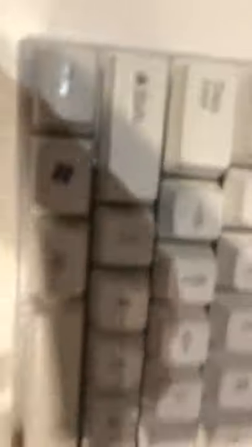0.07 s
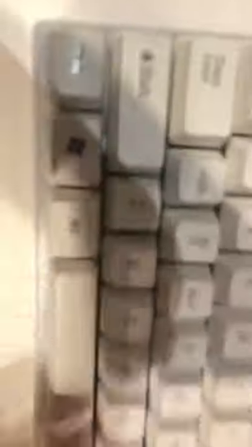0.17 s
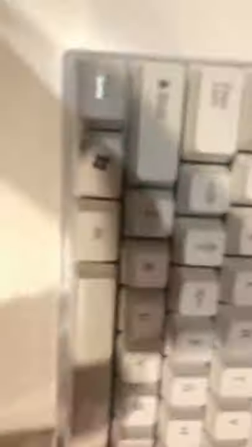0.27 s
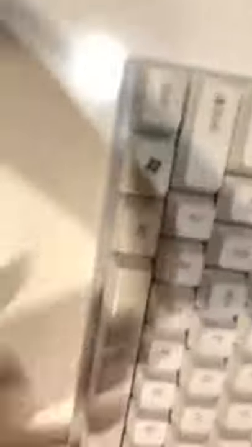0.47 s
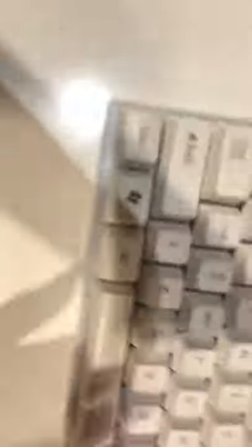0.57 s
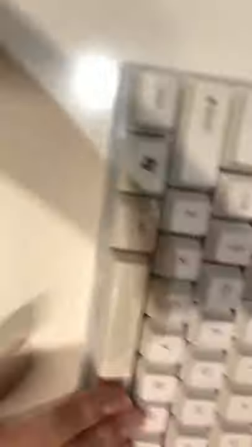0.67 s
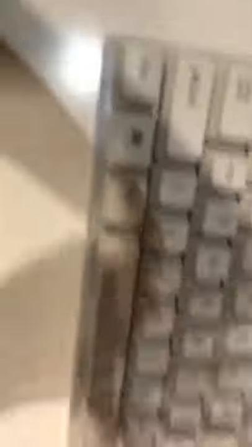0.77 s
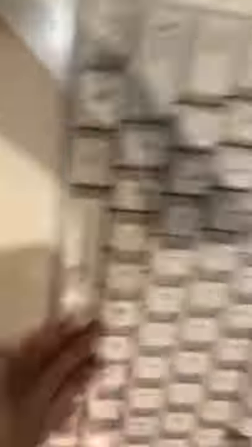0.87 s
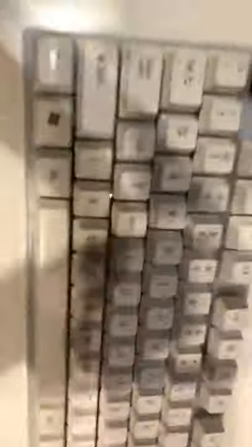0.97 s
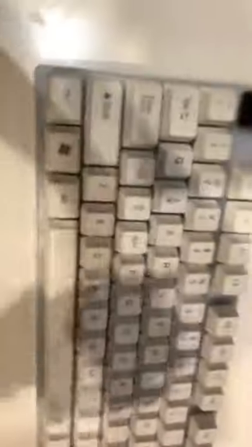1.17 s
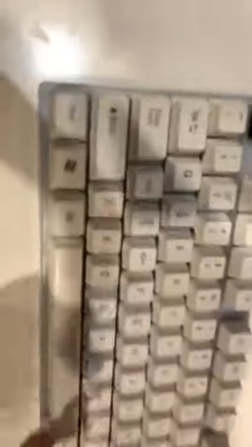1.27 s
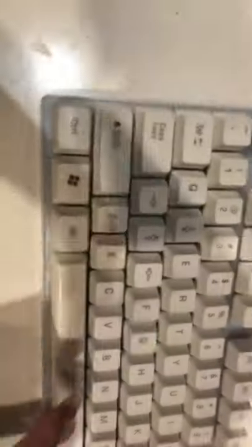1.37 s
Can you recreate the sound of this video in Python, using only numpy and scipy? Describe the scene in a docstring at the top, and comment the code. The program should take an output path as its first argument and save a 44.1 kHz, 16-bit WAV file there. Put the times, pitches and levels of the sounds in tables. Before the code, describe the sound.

A mechanical keyboard's spacebar is slapped five times close to the microphone, at about 0.2, 0.4, 0.55, 0.7 and 0.9 seconds. Each stroke is a sharp plastic clack with lighter rebound knocks and a faint spring ring. The desk thumps low underneath, more strongly on the last two. The bare room rings briefly, fading by about 1.3 seconds, with a faint electrical hum throughout.

```python
"""A faint mains hum in a bare room; then, close to the microphone, the spacebar of a mechanical keyboard
is slapped five times. A faint hiss swells just before each stroke; the bar chatters for a few
milliseconds as it bottoms out, rings the keycap and the case, and shakes the desk. Lighter knocks follow
as the bar rebounds, while the switch springs sing faintly and the room rings on. One microphone."""
import sys
import numpy as np
from scipy import signal
from scipy.fft import rfft, irfft
from scipy.io import wavfile

SR = 44100
rng = np.random.default_rng(int(sys.argv[2]) if len(sys.argv) > 2 else 0)


def transcribe(signal):
    """Save signal, clipped to [-1, 1], as a 16-bit WAV file at the path in sys.argv[1]."""
    frames = np.atleast_2d(signal).T
    limited = np.clip(frames, -1, 1)
    pcm = np.round(limited * 32767).astype(np.int16)
    wavfile.write(sys.argv[1], SR, pcm)


N = 61739

# Where the finger lands decides how much each part rings: start_s, clack_db, clack_pitch_ratio, tick_db,
# chatter_s, tray_db, case_db, plate_db, plate_pitch_ratio, keycap_db, keycap_pitch_ratio, stem_db,
# stabiliser_db, room_db, room_tilt_db_per_octave
STROKES = [(0.2331, -17.5, 0.76, -12.5, 0.003, -28, -11, -13, .81, -11, .98, -23.5, -21.5, -2.95, -0.5),
           (0.376, -18.5, 0.95, -18, 0.0049, -24.5, -14, -17, .96, -16, .92, -11.5, -23.5, -5, 1.47),
           (0.5453, -17, 0.88, -12.5, .0046, -18.5, -10.5, -27, 0.7, -11.5, 1.11, -33.5, -11.5, -2.5, 1),
           (0.702, -19, 0.92, -11.5, 0.005, -14, -9.5, -10.5, 0.96, -14.5, 1.08, -10.5, -14.5, 2.5, 0.5),
           (0.8776, -18, 0.63, -9.5, .0028, -21, -12, -12.5, 0.9, -12, 1.02, -14, -19.5, 5, 0.04)]
# Rebounds of the bar: start_s, clack_db, tick_db, tray_db, case_db
REBOUNDS = [(.2432, -15.5, -41, -25, -13.5), (.2485, -18.5, -44, -21.5, -41),
            (0.3921, -25, -38, -46.5, -40), (0.4138, -20.5, -42, -36.5, -23.5),
            (0.5589, -23.5, -37.5, -37, -26), (.7190, -23, -32, -35, -33.5), (0.759, -29, -24.5, -46, -30),
            (0.896, -15, -24, -22, -29), (0.923, -18, -39, -27.5, -15)]
# Shoves on the desk: start_s, level_db, pitch_ratio
SHOVES = [(0.244, -29.5, 1.4), (0.387, -30.5, 1.0), (.551, -30.5, 0.89), (0.715, -19.5, 1.0),
          (.886, -18.5, 0.97)]
# Mains harmonics: pitch_hz, level_db
HUM_HARMONICS = [(50, -75), (100, -73.5), (150, -56), (250, -68), (350, -80.5)]

# Noise spectra: frequency_hz, density_db
AIR_SPECTRUM = [(20, -34), (40, -12), (75, 0), (150, -8), (300, -13.5), (600, -19), (2000, -24.5),
                (5000, -31), (11000, -42), (16000, -42.5)]
LEAD_IN_SPECTRUM = [(200, -24.5), (1500, -18.5), (2800, -5.5), (3800, -9.5), (6000, -11), (8000, -11.5),
                    (10000, -37.5), (16000, -40)]  # the hiss just before each stroke
CLACK_SPECTRUM = [(30, -42.5), (150, -24.5), (500, -22.5), (800, -2), (1400, -4), (2100, 3), (2900, -1.5),
                  (3600, 0), (4400, -7.5), (6000, -6), (9000, -19), (16000, -23)]  # the duller clack of plastic
TICK_SPECTRUM = [(1000, -29), (5000, -15.5), (6900, -7), (8000, 3), (9200, -7), (10300, 0), (11200, -5.5),
                 (12400, -1), (14000, -12.5), (17000, -5)]  # the fine tick of the switch
ROOM_SPECTRUM = [(25, -31.5), (60, -7.5), (120, 2.5), (200, 0.5), (380, 0), (520, -6.5), (700, -4),
                 (850, -6.5), (1020, -1), (1500, -4), (2150, 2), (2900, -5.5), (4500, -9), (6200, -13.5),
                 (7500, -13), (8250, -11.5), (9000, -17), (11300, -17.5), (12100, -16.5), (13000, -18),
                 (16000, -22)]
# How long the room rings: frequency_hz, t60_s
ROOM_DECAY = [(100, .38), (400, 0.39), (750, 0.37), (1300, 0.41), (2200, 0.4), (4500, 0.39), (8000, 0.36),
              (12000, 0.32), (18000, .32)]

# Modes of each part: pitch_hz, level_db, t60_s
KEYCAP_MODES = [(1760, -10, .035), (2035, 0, .055), (2310, -9, .04), (2740, -4, .03), (3200, -7, .03)]
STEM_MODES = [(3340, -10, .045), (3562, 0, .06), (3675, -4, .05), (5150, -14, .035), (8280, -12, .045)]
STABILISER_MODES = [(4225, 0, .05), (4610, -8, .05), (4950, -2, .05), (5300, -6, .04), (6600, -6, .055),
                    (7900, -2, .04)]
CASE_MODES = [(652, 1.5, 0.049), (725, -14, 0.047), (811, 0.5, 0.046), (1010, -14.5, 0.025)]
PLATE_MODES = [(1069, -7.5, 0.064), (1254, -3, 0.05), (1326, -5, .07)]
TRAY_MODES = [(166, 0.5, 0.079), (200, -5, 0.063), (270, -7, 0.081), (346, -4, 0.071), (387, -1.5, .06),
              (436.5, -5.5, 0.084)]
SPRING_MODES = [(1010, 0, .46), (1178, -7, .45), (2043, -2, .48), (2205, -1, .5), (8130, -7, .33),
                (8370, -8, .33), (12100, -11, .32)]
DESK_MODES = [(46, -1, 0.16), (67.6, 4.5, 0.17), (81, -7, 0.056), (114.7, -6, 0.42), (65.7, -17.5, 1),
              (71.95, -22, 1.0)]

SMALL_PART_RISE_S, CASE_RISE_S, TRAY_RISE_S = 0.00068, 0.0023, 0.0033
CASE_LAG_S, TRAY_LAG_S = 0.0015, 0.003
LEAD_IN_S, ROOM_DELAY_S = 0.019, 0.003


def amp(db):
    """Decibels to gain."""
    return 10 ** (np.asarray(db) / 20)


def unit_rms(x):
    """Scales to rms 1."""
    return x / np.sqrt(np.mean(x ** 2) + 1e-20)


def read_curve(points, hz):
    """Reads a table on a log-frequency axis."""
    points_hz, values = np.transpose(points)
    return np.interp(np.log(hz + 1), np.log(points_hz), values)


def add(mix, start_s, sound):
    """Mixes a sound in at start_s."""
    part = mix[max(round(start_s * SR), 0):][:len(sound)]
    part += sound[:len(part)]


def colour(x, spectrum, tilt_db=0):
    """Gives x a spectrum, tilted by tilt_db per octave about 4 kHz, at rms 1."""
    hz = np.fft.rfftfreq(len(x), 1 / SR)
    octaves = np.log2(np.maximum(hz, 500) / 4000)
    gain = amp(read_curve(spectrum, hz) + tilt_db * octaves)
    return unit_rms(irfft(rfft(x) * gain, len(x)))


def room_tone(air_db=-62):
    """Mains hum and still air, steady behind the keyboard."""
    t = np.arange(N) / SR
    hum = sum(amp(db) * np.sqrt(2) * np.sin(2 * np.pi * (hz * t + rng.random()))
              for hz, db in HUM_HARMONICS)
    return hum + amp(air_db) * colour(rng.standard_normal(N), AIR_SPECTRUM)


def lead_in_hiss(growth_s=0.0046, trim_db=-4.5):
    """A faint hiss swells just before each stroke and fades as it lands."""
    t = np.arange(2048) / SR
    envelope = np.exp(-abs(t - LEAD_IN_S) / growth_s)
    return amp(trim_db) * colour(rng.standard_normal(len(t)), LEAD_IN_SPECTRUM) * envelope


def chatter(length_s, spectrum, pitch=1, contacts_per_s=8000, rise_s=0.0005, fall_s=0.00076):
    """Stem, stabiliser and keycap collide in a tight cluster; harder contacts sound higher."""
    t = np.arange(2048) / SR
    contacts = rng.choice([-1., 1.], len(t)) * (rng.random(len(t)) < contacts_per_s / SR)
    rattle = colour(contacts, [(hz * pitch, db) for hz, db in spectrum])
    envelope = np.minimum(t / rise_s, 1) * np.exp(-np.maximum(t - length_s, 0) / fall_s)
    return unit_rms(rattle * envelope) * np.sqrt(np.mean(envelope ** 2))


def ring(modes, rise_s, pitch=1):
    """A struck part: decaying modes start in alternate directions and swell while the blow lasts."""
    t = np.arange(SR) / SR
    waves = sum((-1) ** k * amp(db - 60 * t / t60) * np.sin(2 * np.pi * hz * pitch * t)
                for k, (hz, db, t60) in enumerate(modes))
    swell = 1 - np.exp(-(t / rise_s) ** 2)
    return waves * swell / np.linalg.norm([amp(db) for _, db, _ in modes])


def strokes():
    """The bar bottoms out, close up: small parts sound first, the heavy ones a moment later."""
    out = np.zeros(N)
    for (start_s, clack_db, clack_pitch, tick_db, chatter_s, tray_db, case_db, plate_db, plate_pitch,
         keycap_db, keycap_pitch, stem_db, stabiliser_db, *_) in STROKES:
        add(out, start_s - LEAD_IN_S, amp(clack_db) * lead_in_hiss())
        add(out, start_s, amp(clack_db) * chatter(chatter_s, CLACK_SPECTRUM, clack_pitch))
        add(out, start_s, amp(tick_db) * chatter(chatter_s, TICK_SPECTRUM))
        add(out, start_s, amp(keycap_db) * ring(KEYCAP_MODES, SMALL_PART_RISE_S, keycap_pitch))
        add(out, start_s, amp(stem_db) * ring(STEM_MODES, SMALL_PART_RISE_S))
        add(out, start_s, amp(stabiliser_db) * ring(STABILISER_MODES, SMALL_PART_RISE_S))
        add(out, start_s + CASE_LAG_S, amp(case_db) * ring(CASE_MODES, CASE_RISE_S))
        add(out, start_s + CASE_LAG_S, amp(plate_db) * ring(PLATE_MODES, CASE_RISE_S, plate_pitch))
        add(out, start_s + TRAY_LAG_S, amp(tray_db) * ring(TRAY_MODES, TRAY_RISE_S))
    return out


def springs(trim_db=-31):
    """The switch springs sing on faintly, as strongly as the stroke fills the room."""
    out = np.zeros(N)
    for start_s, *_, room_db, _ in STROKES:
        add(out, start_s, amp(trim_db + room_db) * ring(SPRING_MODES, rise_s=0.0095))
    return out


def reflections(direct, count=12, spread_s=0.018, level_db=-15.5):
    """Single echoes off the desk and nearby surfaces reach the microphone just behind the direct sound."""
    out = np.zeros(N)
    for lag, polarity in rng.random((count, 2)):
        add(out, ROOM_DELAY_S + lag * spread_s, np.sign(polarity - 0.5) * direct)
    return out * amp(level_db) / np.sqrt(count)


def room_tail(trim_db=-19, rise_s=0.0049, grain_db=2):
    """Each stroke leaves a cloud of echoes in the bare room; the top treble dies first."""
    out, t = np.zeros(N), np.arange(SR) / SR
    swell = 1 - np.exp(-t / rise_s)
    for start_s, *_, room_db, tilt_db in STROKES:
        echoes = rng.standard_normal(SR)
        echoes *= amp(grain_db * np.minimum(rng.exponential(1, SR), 5))  # a few echoes stand out
        hz, age_s, bands = signal.stft(colour(echoes, ROOM_SPECTRUM, tilt_db), SR, nperseg=256)
        decay = amp(-60 * age_s / read_curve(ROOM_DECAY, hz)[:, None])
        tail = signal.istft(bands * decay, SR, nperseg=256)[1][:SR]
        add(out, start_s + ROOM_DELAY_S, amp(trim_db + room_db) * tail * swell)
    return out


def rebounds(chatter_s=0.001):
    """The bar bounces back with short knocks that ring the case and the tray."""
    out = np.zeros(N)
    for start_s, clack_db, tick_db, tray_db, case_db in REBOUNDS:
        add(out, start_s, amp(clack_db) * chatter(chatter_s, CLACK_SPECTRUM))
        add(out, start_s, amp(tick_db) * chatter(chatter_s, TICK_SPECTRUM))
        add(out, start_s, amp(case_db) * ring(CASE_MODES, CASE_RISE_S))
        add(out, start_s, amp(tray_db) * ring(TRAY_MODES, TRAY_RISE_S))
    return out


def desk(rise_s=0.012):
    """The desk top under the keyboard booms with each shove."""
    out, t = np.zeros(N), np.arange(SR) / SR
    swell = 1 - np.exp(-(t / rise_s) ** 2)
    for start_s, level_db, pitch in SHOVES:
        boom = sum(amp(db - 60 * t / t60) * np.sin(2 * np.pi * hz * pitch * t)
                   for hz, db, t60 in DESK_MODES)
        add(out, start_s, amp(level_db) * boom * swell)
    return out


def scene():
    """Keyboard, desk and room at one close microphone."""
    spacebar = strokes() + rebounds()
    return (spacebar + springs() + reflections(spacebar) + room_tail() + desk() + room_tone())[None]


def record(dry):
    """The microphone drops the deepest bass and rounds off peaks; a steep high cut follows."""
    low_cut_hz, high_cut_hz = 33, 15950
    x = signal.sosfilt(signal.butter(4, low_cut_hz, "high", fs=SR, output="sos"), dry)
    rounded = x / (1 + x ** 4) ** 0.25
    high_cut = signal.firwin(511, high_cut_hz, window=("kaiser", 9), fs=SR)
    return signal.oaconvolve(rounded, high_cut[None], "same")


dry = scene()
out = record(dry)
transcribe(out)
```